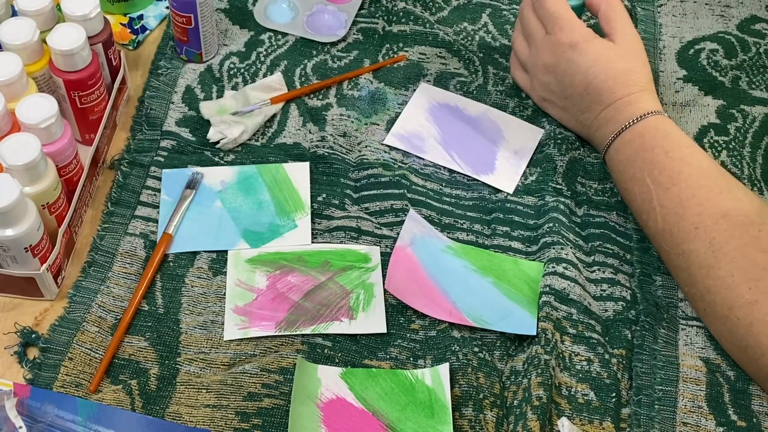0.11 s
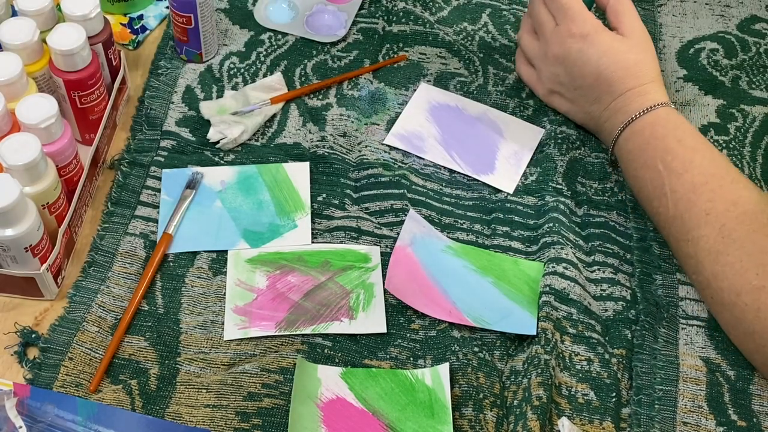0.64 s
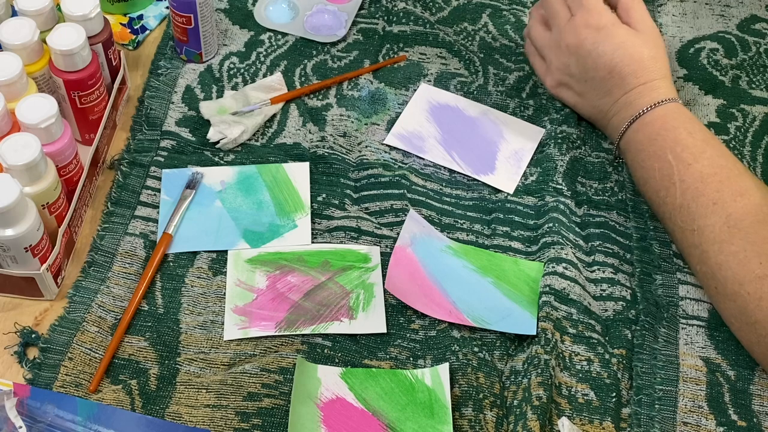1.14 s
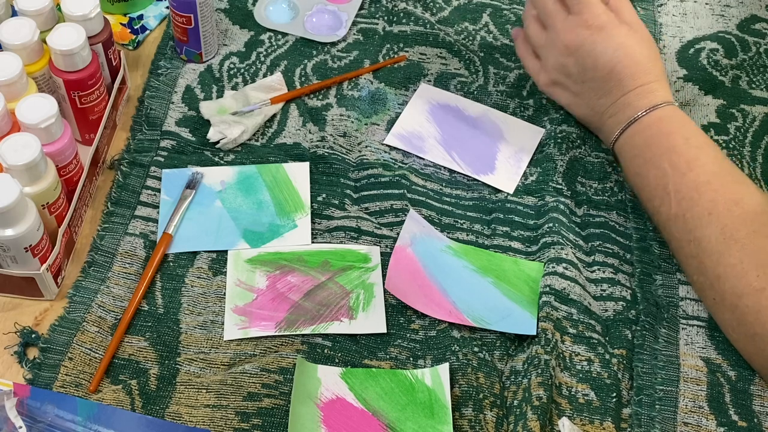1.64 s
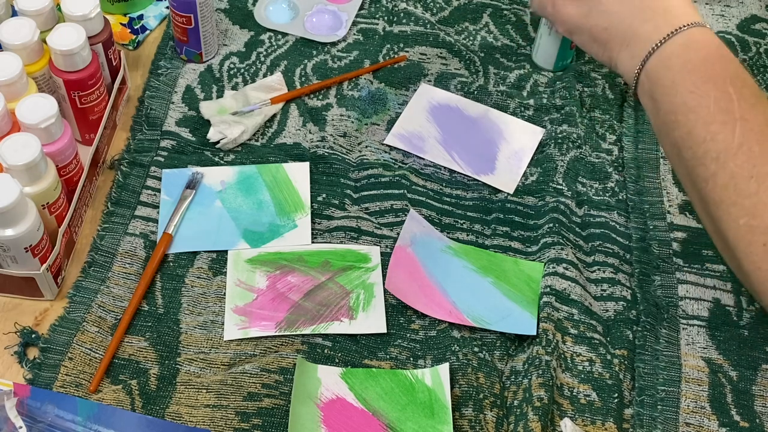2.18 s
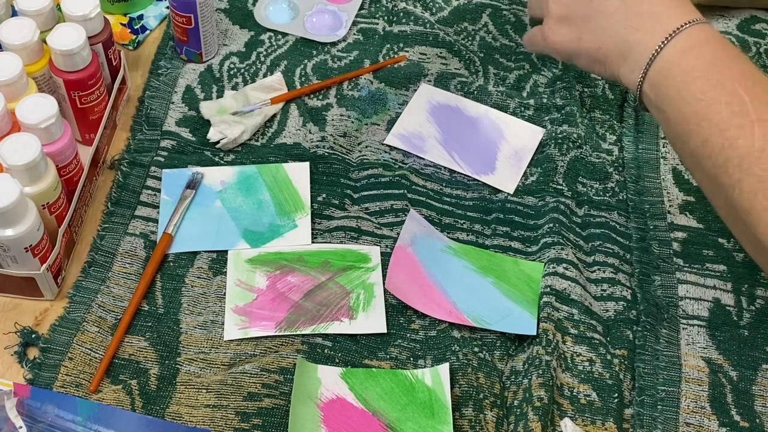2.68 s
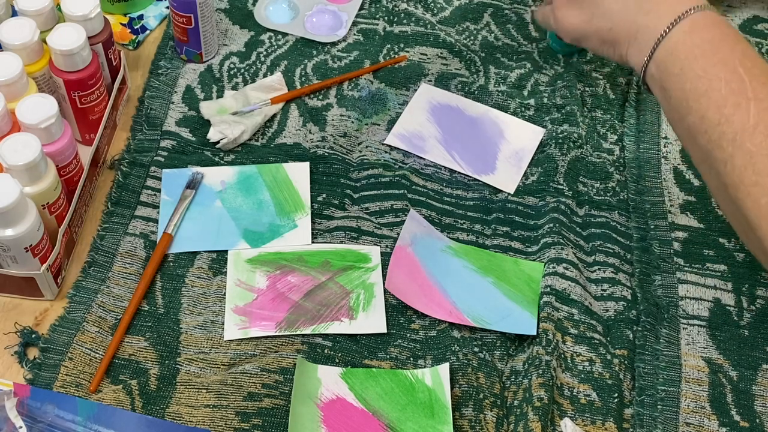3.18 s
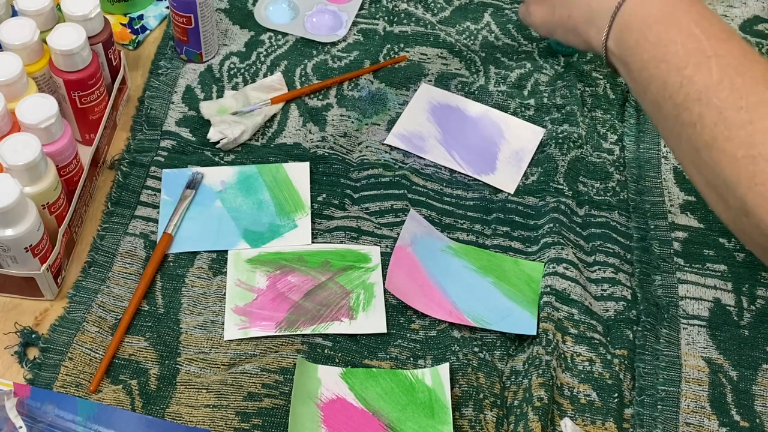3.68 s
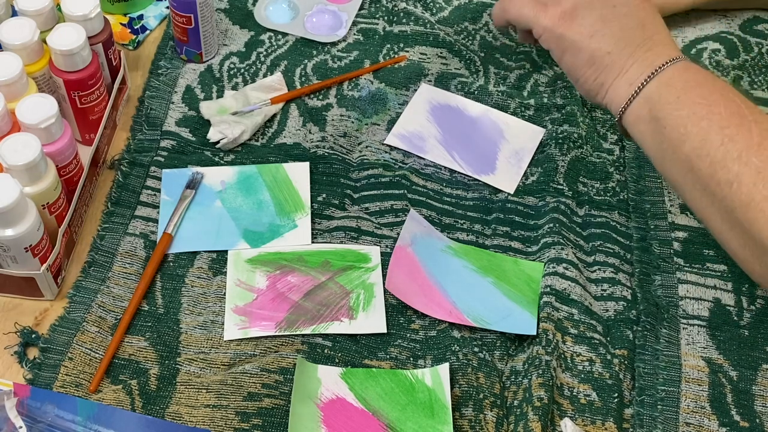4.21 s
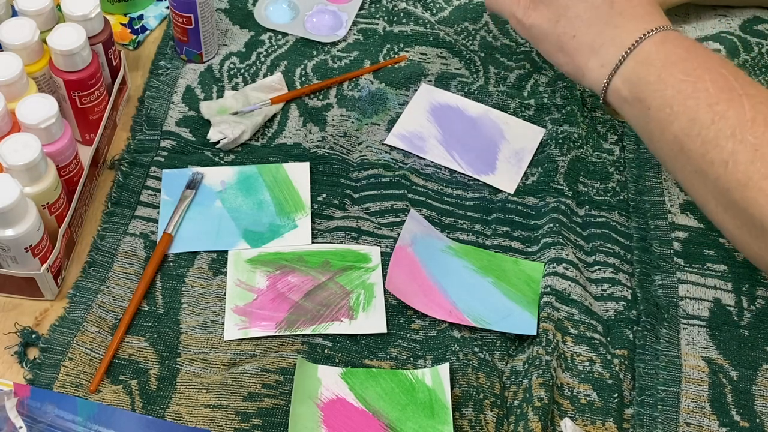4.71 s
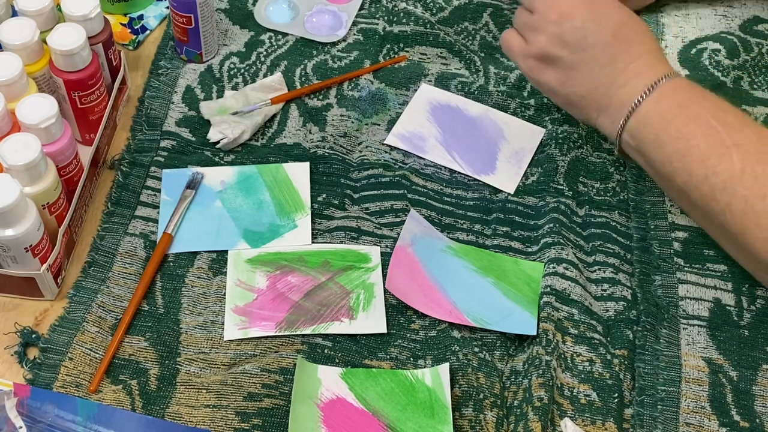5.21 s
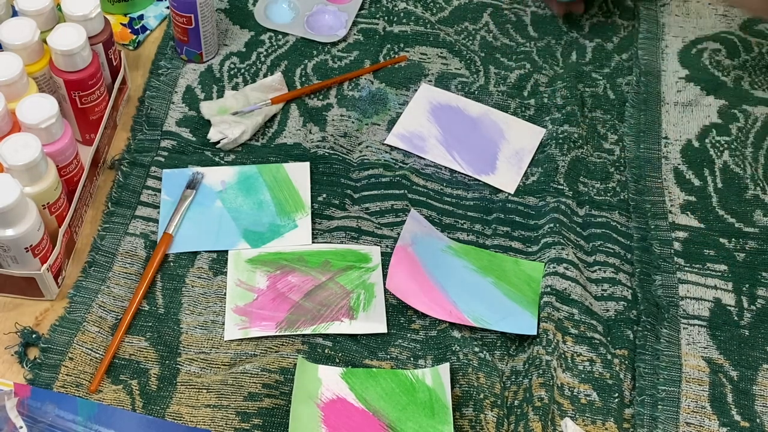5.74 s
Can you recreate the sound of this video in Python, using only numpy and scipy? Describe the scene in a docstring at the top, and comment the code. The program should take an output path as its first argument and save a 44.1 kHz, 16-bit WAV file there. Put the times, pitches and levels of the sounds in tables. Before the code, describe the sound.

Small hollow plastic bottles are picked up and set down an arm's length from the microphone, on a padded table indoors. Crisp clicks, ridged cap scrapes and soft low thuds arrive irregularly, with short brushes of hand on cloth and a very faint squeaky whistle around four seconds. A low hum wavers underneath; the room's echo is short and dry.

```python
"""A low wavering hum and faint room air come first; soon small plastic paint bottles click and thud.
They are handled on a cloth-covered table, an arm's length from a microphone, in a small damped room.
Noise bursts excite wall resonances (clicks, ridged caps scraping); soft pushes ring table modes (thuds);
filtered noise makes the hand brushing the cloth and narrow singing bands; a gliding sine whistles faintly.
Hum is two sines with narrow noise, and a decaying noise tail is the room."""
import sys
import numpy as np
from scipy import signal
from scipy.fft import rfft, irfft, next_fast_len
from scipy.io import wavfile
from scipy.ndimage import uniform_filter1d

SR = 44100
rng = np.random.default_rng(int(sys.argv[2]) if len(sys.argv) > 2 else 0)


def invert_db(x):
    """Field ratio 10**(x/20) for x, a level in decibels (scalar or array-like)."""
    u = np.asarray(x, float) / 20
    return 10 ** u


def waveform_to_disk(signal):
    """Save audio, clipped to [-1, 1], as 16-bit WAV at the path in sys.argv[1]."""
    frames = np.transpose(np.atleast_2d(signal))
    scaled = np.clip(frames, -1, 1) * 32767
    samples = np.round(scaled).astype(np.int16)
    wavfile.write(sys.argv[1], SR, samples)


N = 258426
T = np.arange(N) / SR  # s


def band(x, lo_hz, hi_hz):
    """Band limitation: a second-order Butterworth band-pass."""
    return signal.sosfilt(signal.butter(2, [lo_hz, hi_hz], "band", fs=SR, output="sos"), x)


def unit(x):
    """Normalisation: scale to rms 1."""
    return x / np.sqrt(np.mean(x ** 2))


def colour(x, points):
    """Spectral shaping: level (Hz, dB) points joined along log frequency."""
    hz, db = np.transpose(points)
    size = next_fast_len(N)
    f = np.arange(size // 2 + 1) * SR / size + 1
    gain = invert_db(np.interp(np.log(f), np.log(hz), db))
    return irfft(rfft(x, size) * gain, size)[..., :N]


def peaks(x, table):
    """Parallel resonance: a sum of resonators (Hz, width Hz, dB), neighbours in opposite sense."""
    out = 0
    for k, (hz, width, db) in enumerate(table):
        resonance = signal.lfilter(*signal.iirpeak(hz, hz / width, SR), x)
        out = out + (-1) ** k * invert_db(db) * resonance
    return out


def ring(x, modes):
    """Modal superposition: x strikes damped modes (Hz, t60 s, dB), each a decaying sine."""
    out = 0
    for hz, t60, db in modes:
        pole = np.exp(2j * np.pi * hz / SR - np.log(1000) / (t60 * SR))
        out = out + invert_db(db) * signal.lfilter([1], [1, -pole], x).imag
    return out


def walk(rate):
    """Slow random modulation: levels held 1 / rate s and slewed, spread near 1."""
    k = int(SR / rate)
    held = np.repeat(rng.standard_normal(N // k + 1), k)
    return 1.182 * uniform_filter1d(held, k)[:N]


def swell(s, db, rise_s, fall_s):
    """Exponential growth and decay: a gain straight in dB either side of its peak, with abrupt ends.

    rise_s and fall_s are the times for 30 dB."""
    late = T - s
    gain = invert_db(db - 30 * np.maximum(-late / rise_s, late / fall_s))
    return gain * (late > -rise_s) * (late < 1.5 * fall_s)


# difference of left and right for sound from all around: (frequency [Hz], side minus mid [dB])
SIDE_LEVEL = [(60, -18.5), (200, -9), (700, -4), (1300, 2), (2400, -11), (4400, -11), (8000, -8.5),
              (15000, -23)]


def wide(x, other):
    """Diffuse-field decorrelation: an unrelated signal is added left and subtracted right."""
    return x + colour(other, SIDE_LEVEL) * np.array([[1], [-1]])


# spectral shape of the room air: (frequency [Hz], relative density [dB])
AIR_SPECTRUM = [(25, -37), (40, 1), (60, 8), (100, -1), (140, -6), (170, -14.5), (220, -12), (280, -21),
                (450, -25), (750, -30.5), (1000, -37.5), (3000, -46), (7000, -48), (11000, -52),
                (14000, -54), (16000, -78.5)]


def air():
    """Stationary broadband noise: coloured room air whose level swells a little."""
    level_db, swell_db = -54, 0.9
    mid, side = colour(rng.standard_normal((2, N)), AIR_SPECTRUM)
    return wide(mid, side) * invert_db(level_db + swell_db * walk(2)) / np.std(mid)


# level of the lower hum tone before its waver: (time [s], level [dB])
LOWER_HUM = [(0, -49), (.41, -51.5), (.67, -69), (1.0, -48), (1.7, -45), (2.05, -48.5), (2.6, -52.5),
             (3.2, -49.5), (4.3, -55.5), (5.86, -70)]


def hum():
    """Tonal and narrow-band superposition: two low wavering sines, each inside a band of noise."""
    hum_hz, width_hz, waver_db = (56.5, 97), (1.7, 1.3), (1.5, -1.37)
    rough_db = -6  # noise relative to a sine's peak
    levels = np.interp(T, *np.transpose(LOWER_HUM)), -56  # dB
    out = 0
    for hz, width, db, waver in zip(hum_hz, width_hz, levels, waver_db):
        wobble = unit(peaks(rng.standard_normal(N), [(hz, width, 0)]))
        phase = 2 * np.pi * np.cumsum(hz * (1 + 0.015 * walk(3.096))) / SR
        out = out + invert_db(db + waver * walk(2.4)) * (np.sin(phase) + invert_db(rough_db) * wobble)
    return out


def room(x):
    """Reverberant decay: a short dense noise tail fades in just after the direct sound."""
    t60_s, level_db, gap_s = 0.13, -6, 0.0013
    t = np.arange(SR // 4) / SR
    shape = np.exp(-np.log(1000) * t / t60_s) * np.clip(t / gap_s, 0, 1)
    tails = rng.standard_normal((2, len(t))) * shape / np.sqrt(np.sum(shape ** 2))
    mid, side = signal.fftconvolve(x[None], tails, axes=1)[:, :N]
    return invert_db(level_db) * wide(mid, side)


# swells of the whistle before its flicker: (peak time [s], peak level [dB], 30 dB rise [s], 30 dB fall [s])
WHISTLE_LEVELS = [(3.83, -88, .2, .5), (4.09, -79, .2, .35)]


def whistle():
    """Frequency glide: a thin wavering sine sinks ever more slowly towards a floor pitch."""
    start_s, end_s, sink_s = 3.76, 4.24, 0.165
    start_hz, floor_hz = 8000, 1900
    late = np.maximum(T - start_s, 0)
    hz = floor_hz + (start_hz - floor_hz) * np.exp(-late / sink_s)
    phase = 2 * np.pi * np.cumsum(hz * (1 + 0.007 * walk(200))) / SR
    level = sum(swell(*row) for row in WHISTLE_LEVELS) * invert_db(2.5 * walk(40))
    return np.sin(phase) * level * (late > 0) * (T < end_s)


# bands that sing in the brushing:
# (peak time [s], peak level [dB], 30 dB fall [s], start frequency [Hz], end frequency [Hz])
SINGING_BANDS = [(2.07, -66.5, 0.041, 2605, 2430), (3.634, -57.5, 0.13, 1620, 1750),
                 (3.7, -69, 0.45, 1934, 1914), (5.079, -73.5, .9, 1800, 1930),
                            (5.266, -60.5, .08, 1280, 1510), (5.4, -73, 0.081, 1600, 1640)]


def singing():
    """Heterodyning: slow complex noise rides a carrier that glides after each peak, then is faded out."""
    width_hz, rise_s, glide_s = 280, 0.024, 0.155
    sos = signal.butter(2, width_hz / 2, fs=SR, output="sos")
    re, im = signal.sosfilt(sos, rng.standard_normal((2, N)))
    out = 0
    for s, db, fall_s, start_hz, end_hz in SINGING_BANDS:
        hz = np.interp(T, (s, s + glide_s), (start_hz, end_hz))
        carrier = np.exp(2j * np.pi * np.cumsum(hz) / SR)
        tone = unit(((re + 1j * im) * carrier).real)
        fade_out = uniform_filter1d(1.0 * (T < s + glide_s), size=2000)
        out = out + tone * swell(s, db, rise_s, fall_s) * fade_out
    return out


# hand and bottle brushing the cloth: (peak time [s], peak level [dB], 30 dB rise [s], 30 dB fall [s],
# dull part [dB re peak], treble [dB re peak])
BRUSH_STROKES = [(.13, -80.5, 0.24, 0.14, -11, -12), (0.261, -70, 0.0088, 0.022, -13, -10),
                 (1.999, -58, 0.088, 0.036, 3.5, -3), (2.069, -76.5, 0.011, 0.041, 10, 16),
                 (2.211, -97.5, .3, .5, 15, 15), (2.474, -86.5, 0.0089, 0.18, 19.5, -17.5),
                 (2.672, -97, 0.023, 0.17, 3, -17.5), (3.502, -71.5, 0.054, 0.34, -5, 4.5),
                 (3.634, -59, 0.014, 0.11, -1.5, -30), (3.784, -81.5, 0.14, 0.22, 6, -3),
                 (3.9, -71.5, .06, 0.12, -14, -6), (4.96, -75, .03, 0.033, 6, -10),
                 (5.07, -71.5, 0.09, 0.26, 0, -6.5), (5.264, -71.5, 0.011, 0.077, -8, -6),
                 (5.23, -91, 0.074, 0.28, 19, -9), (5.37, -83, 0.27, 0.37, 8, -6),
                 (5.49, -73, 0.33, 0.69, -14, -2.5)]
# cloth resonances, main and dull: (frequency [Hz], width [Hz], relative level [dB])
CLOTH_MAIN = [(1330, 670, 2), (1800, 900, 7.5), (2960, 1500, 0.5), (5210, 400, -2.5)]
CLOTH_LOW = [(447, 920, -11.5), (890, 430, -6.5)]


def brushes():
    """Friction noise: fibre noise excites a few broad resonances, with a thin hiss above."""
    press, dull, treble = np.zeros((3, N))
    for *stroke, dull_db, treble_db in BRUSH_STROKES:
        gain = swell(*stroke)
        press += gain
        dull += invert_db(dull_db) * gain
        treble += invert_db(treble_db) * gain
    noise = rng.standard_normal((3, N))
    rub = press * unit(peaks(noise[0], CLOTH_MAIN)) + dull * unit(peaks(noise[1], CLOTH_LOW))
    return rub + treble * unit(band(noise[2], 2000, 14000))


# thuds into the table top: (time [s], push strength [dB], knock [dB re push], push length [ms])
TABLE_THUDS = [(0.126, -42, -7.5, 8.5), (1.167, -30.5, -26, 7.9), (1.186, -38.5, -18, 2),
               (1.288, -35, -3.5, 7.9), (1.618, -44, -23, 2.4), (1.875, -48.5, 13, 5.1),
               (1.893, -29.5, 3.5, 0.99), (1.914, -33, -21, 3.5), (1.943, -30.5, 0.5, 3.9),
               (1.969, -36, 2, 7.1), (2.091, -39.5, -8.5, 7.9), (2.2, -60, 4, 1.3), (2.469, -51, -18, 2),
               (2.657, -50.5, 1, 7.8), (3.296, -41.5, -3.5, 5.6), (3.36, -43.5, -9.5, 5.9),
               (3.549, -43.5, -12, 7.4), (4.12, -57, -7, 3.1), (4.832, -43.5, -2.5, 10.3),
               (4.91, -43.5, -3.5, 3.8), (5.267, -47, -40, 1.2)]
# table top, low modes and knock modes: (frequency [Hz], t60 [s], relative level [dB])
LOW_MODES = [(72.67, 0.036, -8), (121, 0.13, 3.5), (172, 0.05, -1.5), (279.5, 0.24, -15.5)]
KNOCK_MODES = [(367, 0.057, -8.5), (436, 0.043, -1.5), (513, 0.036, -5.5), (580, 0.14, -6.5),
               (642.6, .04, -11.5), (970, 0.037, -20.5)]


def thuds():
    """Impact excitation: a soft push rings low modes; its sharper edge and a scuff ring knock modes."""
    scuff_db, scuff_s = -6, 0.036  # level against the knock, decay time constant
    low, knock = np.zeros((2, N + 2000))
    t = np.arange(2000) / SR
    scuffs = rng.standard_normal((len(TABLE_THUDS), len(t))) * np.exp(-t / scuff_s)
    for (s, db, knock_db, push_ms), scuff in zip(TABLE_THUDS, scuffs):
        i = int(s * SR)
        push = np.hanning(int(np.clip(push_ms, 0.3, 12) * SR / 1000) + 2)
        low[i:i + len(push)] += invert_db(db) * push / push.sum()
        edge = push[::4]  # the same pulse, four times shorter
        size = invert_db(db + knock_db)
        knock[i:i + len(edge)] += size * edge / edge.sum()
        scuff = band(scuff / np.linalg.norm(scuff), 320, 1300)
        knock[i:i + len(t)] += size * invert_db(scuff_db) * scuff
    return (ring(low, LOW_MODES) + ring(knock, KNOCK_MODES))[:N]


# broad resonances of the plastic: (frequency [Hz], width [Hz], level before the overall lift [dB])
WALL_RESONANCES = [(2110, 190, 2), (3190, 77, -1), (4624, 290, 3), (5650, 170, -1), (5960, 200, -9),
                   (8100, 3600, -0.5), (9710, 2000, -4.5), (10250, 1200, -2.5), (13840, 370, 2.5)]


def plastic(body, middle, upper, top, lift_db):
    """Source and filter: four ranges of a contact force pass resonances of the bottle's wall in turn."""
    force = band(body, 240, 1000) - band(middle, 1400, 3300)
    force = force + band(upper, 3700, 9580) - band(top, 11000, 15640)
    for mode in WALL_RESONANCES:
        force = force + invert_db(lift_db) * peaks(force, [mode])
    return force


# ridged cap scraping: (peak time [s], peak strength before range gains [dB], 30 dB rise [s],
# 30 dB fall [s], middle range [dB re peak])
CAP_SCRAPES = [(1.87, -43.5, 0.0091, 0.064, -14.5), (1.894, -29, 0.022, 0.067, -14),
               (1.946, -36, 0.036, 0.057, -6), (3.276, -51.5, .008, 0.16, -11.5),
               (3.299, -39, 0.029, 0.078, -11.5), (3.328, -52, 0.062, 0.029, 1.5),
               (3.39, -58.5, 0.11, 0.056, 3.5), (3.504, -48, 0.018, 0.077, -27),
               (3.524, -53, 0.037, 0.026, -25), (4.75, -69, .06, .06, -2)]


def scrapes():
    """Stick-slip friction: dense grains of uneven size drive the plastic wall."""
    body_gain, top_gain = invert_db(-20), invert_db(-1)
    push = sum(swell(*row[:4]) for row in CAP_SCRAPES)
    push_mid = sum(invert_db(row[4]) * swell(*row[:4]) for row in CAP_SCRAPES)
    grains = unit(rng.standard_normal(N) * invert_db(2.2 * rng.exponential(size=N)))
    grains = grains * invert_db(2.5 * walk(250))  # patchy level
    force = push * grains
    return plastic(body_gain * force, push_mid * grains, force, top_gain * force, lift_db=-6)


# plastic clicks: (time [s], strength before range gains [dB],
# body, middle and top ranges [dB re strength, before range gains])
PLASTIC_CLICKS = [(0.0702, -54.5, -23, 10.5, -26), (0.174, -63, -12, 10, -11), (0.2583, -49.5, -17, 5, 2),
                  (1.1376, -29.5, -9.5, -3, 1.5), (1.1663, -41, 3.5, 14.5, -11.5),
                  (1.285, -16, -1.5, -2.5, 3.5), (1.6184, -56.5, -12, 8, 1), (1.871, -37.5, -29, -30, -5),
                  (1.9433, -32, -31, -28, -5.5), (2.0682, -40, -34, -12, -22),
                  (2.4714, -62, 24.5, -1.5, -7.5), (2.5111, -46.5, -21.5, -8.5, 1),
                  (2.518, -43.5, -29, -1, 7), (2.6589, -57, -9, 5, 19), (2.7248, -44.5, -37, -6, 17.5),
                  (2.819, -44, -31.5, 4.5, 16.5), (2.9004, -65, -2.5, -19, 18), (3.04, -36.5, -39, -4, 16),
                  (3.6295, -51.5, 5, 3.5, -17.5), (3.884, -31.5, -46, -32, 4.5),
                  (3.9003, -41, -35.5, -6, 8), (4.0216, -36, -16, 7, 5), (4.1153, -36.5, -37.5, -27, -9.5),
                  (4.2112, -44, -24.5, -38, 5), (4.2262, -39, -32.5, -46, 6), (4.336, -48, -26, -11, -3),
                  (4.3528, -45, -22, -15.5, 1.5), (4.4464, -56.5, -20, -23, -15),
                  (4.614, -59, -38, -11, -15), (4.6352, -33.5, -46.5, -7, 0), (4.7173, -48.5, -13, -9, 1),
                  (4.7613, -43, -28, -5, -4), (4.7924, -40.5, -31, -4, 3.5), (4.8186, -42, -3.5, 2, 16.5),
                  (4.833, -21.5, -6.5, -5.5, -7), (4.8539, -25.5, -9.5, -12, 9.5),
                  (4.909, -20.5, -12, -5.5, 6), (4.9152, -36.5, -38, -26, 2),
                  (4.941, -44, -33.5, -12, -27.5), (4.9471, -26.5, -33, -7.5, 0.5),
                  (5.0277, -53, -18, 0, 11), (5.0495, -40.5, -19.5, -21, 8), (5.0708, -43, -17, -25, 1),
                  (5.1497, -48.5, -13, 0, -9), (5.2622, -55, 19.5, 13, -29), (5.4132, -55, -10, -17, 2.5),
                  (5.7461, -40.5, -24, -9.5, 1), (5.837, -51.5, -31, 11, -25)]


def clicks():
    """Contact dynamics: a sharp touch, brief chatter, one bounce and a rattle, with one wall mode ringing."""
    chatter_s, scatter_db, touch_db = 0.00056, 4, -1
    bounce_s, bounce_db = 0.0012, -7.5
    rattle_s, rattle_db = 0.0087, -24  # loose parts keep rattling
    ring_t60, ring_db = 0.011, -16
    gain_db = (14, 8, 8, 9)  # body, middle, upper, top
    t = np.arange(2400) / SR
    fade = np.exp(-t / chatter_s)
    fade = fade + invert_db(bounce_db) * np.interp(t - bounce_s, t, fade, left=0)
    fade = fade + invert_db(rattle_db) * np.exp(-t / rattle_s)
    chance = rng.standard_normal((len(PLASTIC_CLICKS), 2, len(t)))
    struck_hz = rng.choice(np.array(WALL_RESONANCES)[2:6, 0], len(PLASTIC_CLICKS))
    force, rings = np.zeros((4, N + len(t))), np.zeros(N + len(t))
    for (s, db, body_db, mid_db, top_db), hz, (noise, grain) in zip(PLASTIC_CLICKS, struck_hz, chance):
        # micro-slips make the burst lumpy
        burst = noise * fade * invert_db(scatter_db * unit(uniform_filter1d(grain, size=16)))
        burst = burst / np.linalg.norm(burst) + invert_db(touch_db) * (t == 0)
        range_db = db + np.array([body_db, mid_db, 0, top_db]) + gain_db
        i = int(s * SR)
        force[:, i:i + len(t)] += invert_db(range_db)[:, None] * burst
        decay = np.exp(-np.log(1000) * t / ring_t60)
        rings[i:i + len(t)] += invert_db(db + ring_db) * np.sin(2 * np.pi * hz * t) * decay
    return plastic(*force[:, :N], lift_db=-4.5) + rings[:N]


def scene():
    """Linear superposition: the handled things, their room tail and the background."""
    near = clicks() + scrapes() + thuds() + brushes() + singing() + whistle()
    return near + room(band(near, 362, 14500)) + hum() + air()


def top_cut(x):
    """Nothing passes above the cut-off."""
    return signal.sosfilt(signal.butter(12, 16850, fs=SR, output="sos"), x)


# phase of left ahead of right: (frequency [Hz], lead [rad])
PORT_LEAD = [(0, 0), (900, 0), (1400, -.7), (1800, 0), (6800, 0), (8550, -np.pi), (9300, -5.2),
             (10300, -6.5), (12150, -3 * np.pi), (13700, -12.4), (15000, -14), (16500, -14.5)]


def record(dry):
    """Band-limited transduction: the microphone trims both ends; its two ports part in phase."""
    sos = np.vstack([signal.butter(2, 36.2, "high", fs=SR, output="sos"),
                     signal.butter(8, 15900, fs=SR, output="sos")])
    trimmed = signal.sosfilt(sos, dry)
    size = next_fast_len(N)
    lead = np.interp(np.arange(size // 2 + 1) * SR / size, *np.transpose(PORT_LEAD))
    turn = np.exp(0.5j * lead * np.array([[1], [-1]]))  # half the lead on each side
    mix = irfft(rfft(trimmed, size) * turn, size)[:, :N]
    return top_cut(mix)


dry = scene()
out = record(dry)
waveform_to_disk(out)
```